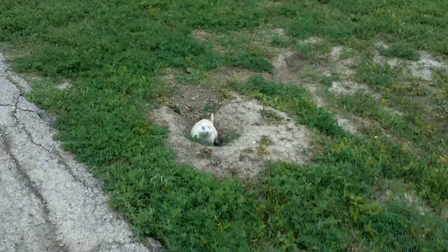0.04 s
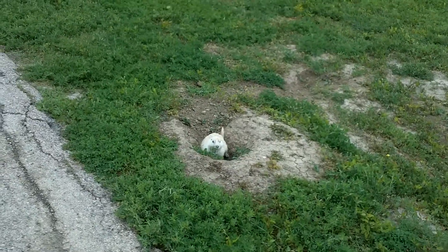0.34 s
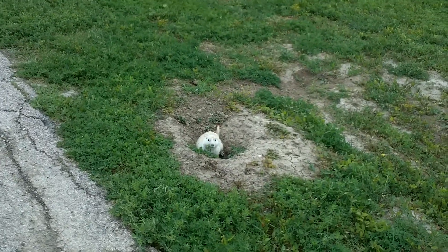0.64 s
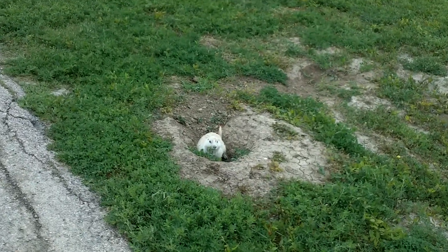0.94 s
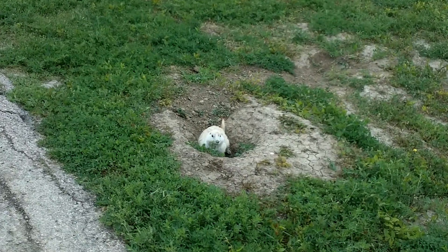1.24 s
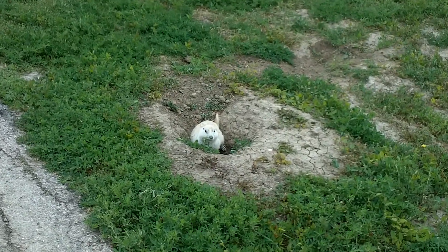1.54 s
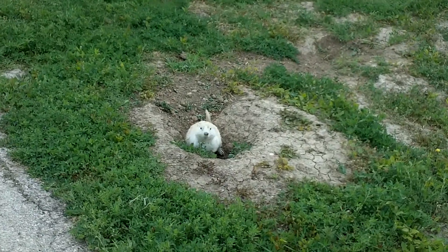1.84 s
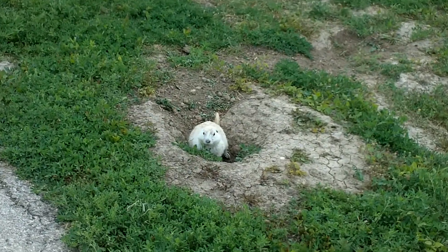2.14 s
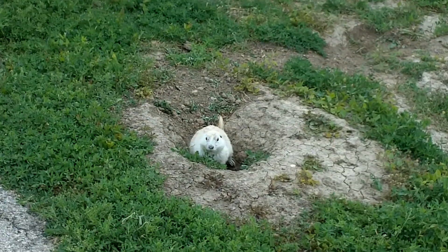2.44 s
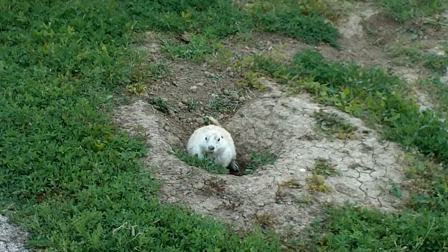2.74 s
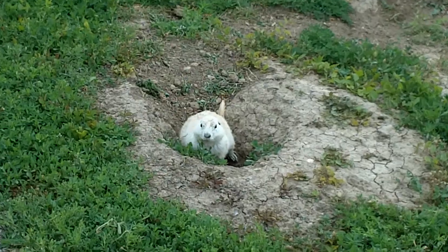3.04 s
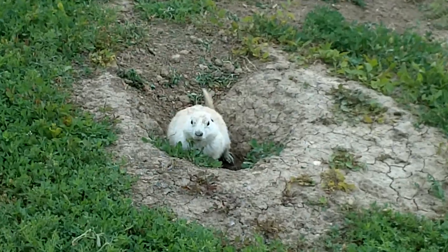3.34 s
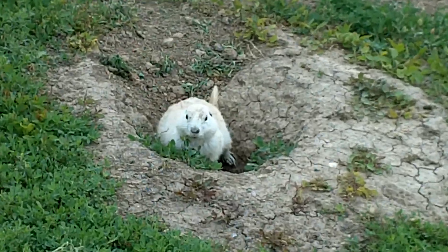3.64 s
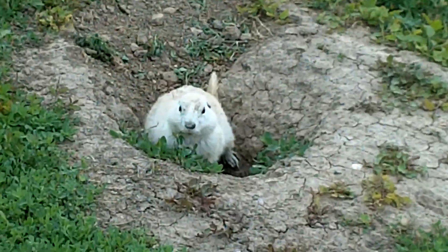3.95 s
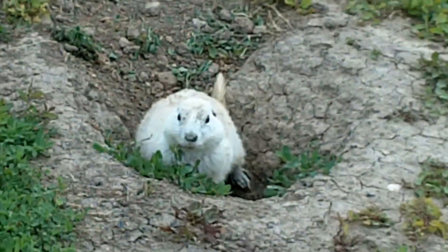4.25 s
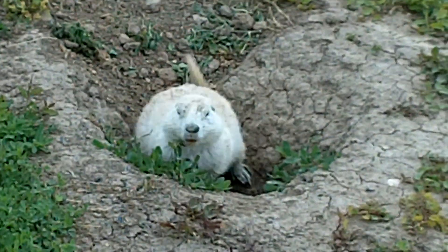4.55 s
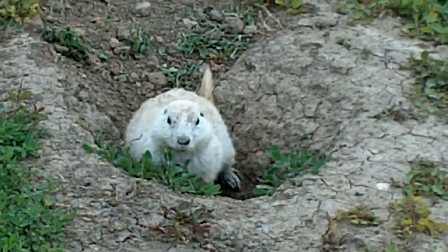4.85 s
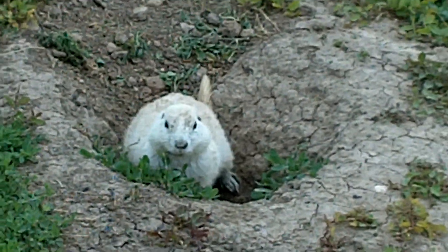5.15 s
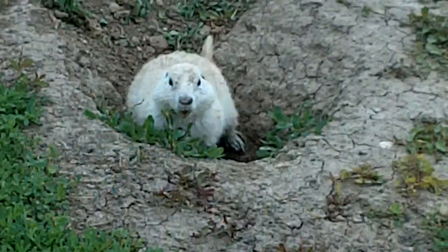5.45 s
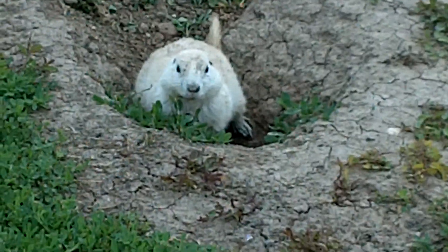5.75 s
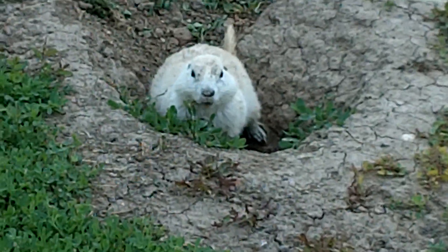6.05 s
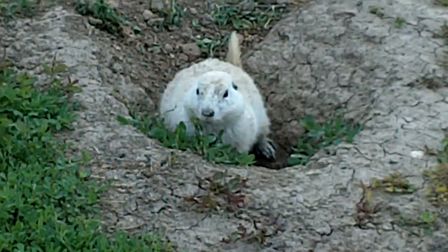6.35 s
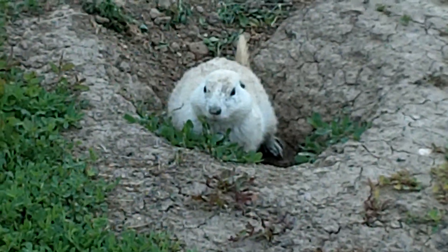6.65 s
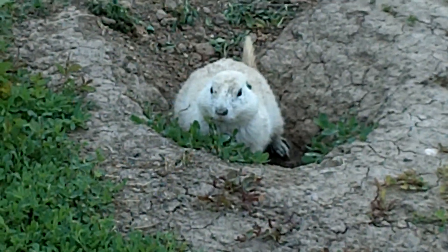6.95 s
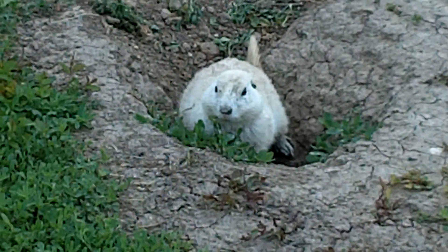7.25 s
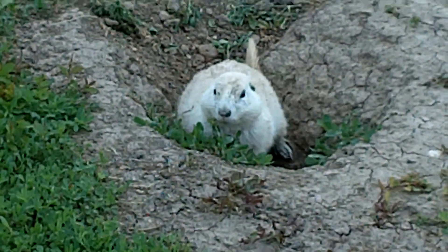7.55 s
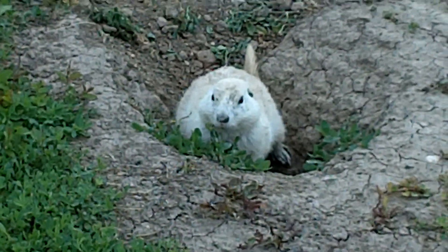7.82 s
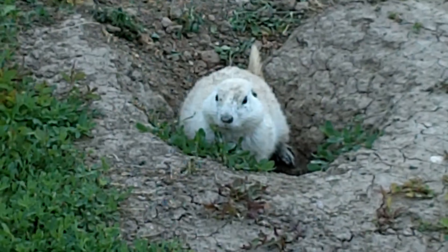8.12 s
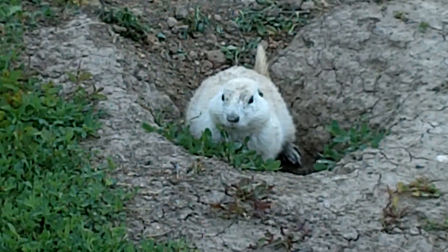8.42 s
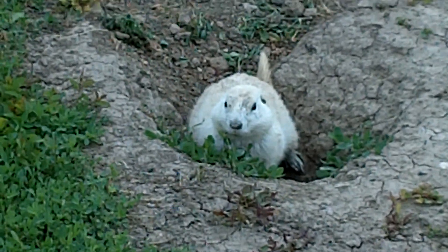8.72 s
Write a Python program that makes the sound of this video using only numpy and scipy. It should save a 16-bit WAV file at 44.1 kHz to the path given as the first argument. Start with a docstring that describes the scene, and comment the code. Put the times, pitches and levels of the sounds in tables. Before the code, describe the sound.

After a quick creak of handling on the microphone, a quiet open field is heard, with low distant traffic and faint high bird chirps. About two seconds in, a prairie dog starts barking: six short, piercing yips with pauses between them, far louder than anything else, the first ending in a small wheeze. The calls stop, and the rumble swells gently as a heavier vehicle goes by far away.

```python
"""A prairie dog at its burrow gives six sharp yips: arched harmonic calls that roughen as the vocal
folds flutter, each ending in two small rasps. The first trails off in a wheezy squeak; the far side of
the field returns a faint echo. Behind, distant traffic and an idling engine hum, small birds chirp and
a heavier vehicle passes near the end. A faint whine fades at the start. The hand-held camera creaks;
its gain control ducks on the yips."""
import sys
import numpy as np
from scipy import signal
from scipy.fft import rfft, irfft, next_fast_len
from scipy.io import wavfile
from scipy.ndimage import uniform_filter1d, minimum_filter1d, map_coordinates

SR = 44100
rng = np.random.default_rng(int(sys.argv[2]) if len(sys.argv) > 2 else 0)


def to_wav(sig):
    """Store sig (one row per channel, or 1-D mono) as 16-bit WAV at the path in sys.argv[1].

    Samples outside -1..1 are clipped; the rate is SR.
    """
    pcm = np.clip(np.atleast_2d(sig), -1, 1) * 32767
    pcm = np.round(pcm).astype(np.int16)
    wavfile.write(sys.argv[1], SR, pcm.T)  # frames by channels


N = 391608


def amp(db):
    """dB to gain."""
    return 10 ** (np.asarray(db) / 20)


def unit(x):
    """x at rms 1."""
    return x / np.sqrt(np.mean(x ** 2) + 1e-20)


def clock(length_s):
    """Sample times of a short sound."""
    return np.arange(max(int(length_s * SR), 16)) / SR


def add(track, at_s, sound):
    """Mix a sound into the track."""
    start = max(round(at_s * SR), 0)
    track[start:start + len(sound)] += sound[:N - start]


def gain(points, hz):
    """Gain curve through (f/Hz, level/dB) points; -68 dB/octave beyond the ends."""
    f, db = np.transpose(points)
    octaves_out = np.abs(np.log2((hz + 1) / np.clip(hz + 1, f[0], f[-1])))
    return amp(np.interp(np.log(hz + 1), np.log(f), db) - 68 * octaves_out)


def filtered(x, response):
    """x through a frequency response."""
    n = x.shape[-1]
    m = next_fast_len(n + 4096)
    return irfft(rfft(x, m) * response(np.fft.rfftfreq(m, 1 / SR)), m)[..., :n]


def coloured(x, points):
    """x through a gain curve, at rms 1."""
    return unit(filtered(x, lambda hz: gain(points, hz)))


def noise(size, points):
    """Coloured noise, rms 1."""
    return coloured(rng.standard_normal(size), points)


def wobble(size, rate_hz):
    """Smooth random curve, rate_hz knots a second."""
    knots = rng.standard_normal(int(size * rate_hz / SR) + 4)
    return map_coordinates(knots, [np.arange(size) * rate_hz / SR])


def cycle(hz):
    """Running phase/rad of a moving frequency."""
    return 2 * np.pi * np.cumsum(hz) / SR


def glide(length_s, pitches_hz, waver):
    """Softly swelling whistle, bent smoothly through the pitches."""
    u = np.linspace(0, 1, len(clock(length_s)))
    curve = np.polyfit(np.linspace(0, 1, len(pitches_hz)), pitches_hz, len(pitches_hz) - 1)
    hz = np.polyval(curve, u) * (1 + waver * wobble(len(u), 900))
    return np.sqrt(2) * np.sin(np.pi * u) * np.sin(cycle(hz))


def patchy(x, depth_db):
    """Moving air makes narrow bands of far sound swell and sink; rms 1."""
    bands = signal.stft(x, nperseg=2048)[2]
    swell = uniform_filter1d(rng.standard_normal(bands.shape), size=4, axis=0)
    swell = uniform_filter1d(swell, size=7, axis=1)
    return unit(signal.istft(bands * amp(depth_db * unit(swell)), nperseg=2048)[1][:N])


def idling_engine():
    """Two low hum lines, wandering in pitch and level."""
    # hum lines: f/Hz, width/Hz, level/dB re rumble
    lines = [(75.5, 5.65, -4), (115.6, 7.77, -5.5)]
    hum = np.zeros(N)
    for hz, width_hz, db in lines:
        peak = np.sqrt(2) * amp(db + 1.3 * wobble(N, 2.7))
        hum += peak * np.sin(cycle(hz + width_hz / 2 * wobble(N, 18)))
    return hum


def traffic():
    """Rumble and idle hum; a far road's drone, roar and tyres swell together; a heavier vehicle passes."""
    # spectra of far rumble, passing engine, drone, roar and tyre hiss: f/Hz, level/dB
    rumble_colour = [(15, -27), (25, 1.5), (38, -0.5), (55, -4), (75, -3), (95, -10), (120, -3),
                     (145, -7.5), (180, -13), (230, -18), (290, -24.5), (400, -23)]
    pass_colour = [(25, -9), (50, 0.5), (70, 1.5), (90, -1.5), (120, -4), (160, -11.5), (250, -22.5),
                   (400, -25)]
    drone_colour = [(200, -12.5), (320, -20), (450, -5), (570, 1), (720, -2), (850, 0.5), (1050, -15),
                    (1600, -16.5)]
    roar_colour = [(500, -9), (850, 3.5), (1000, 3), (1250, 2.5), (1500, -4), (1800, -20.5), (2600, -30)]
    tyre_colour = [(900, -8), (1700, 6), (2500, 0.5), (3300, -3.5), (4000, -11.5), (4750, -15.5),
                   (5400, -19), (6600, -24), (8000, -23.5), (12000, -43.5)]
    # road loudness: t/s, level/dB
    road = [(0.12, -45), (0.34, -49.5), (0.73, -51.5), (1.29, -46.5), (1.73, -57.5), (2.87, -57.5),
            (3.41, -52.5), (3.66, -55.5), (4.9, -52.5), (5.46, -55.5), (5.83, -53.5), (6.24, -54),
            (7.02, -45), (7.32, -48), (8.1, -46), (8.88, -46.5)]
    # tyre hiss swells: t/s, half width/s, lift/dB
    swells = [(1.03, 0.11, 2.5), (3.4, 0.15, 1.5), (4.95, 0.52, 2), (7.8, 0.26, 5.5)]
    usual_road_db, closest_s = -52, 8.01
    t = np.arange(N) / SR

    def passing(db, half_power_s):
        """1/distance gain of the vehicle."""
        return amp(db) / np.hypot(1, (t - closest_s) / half_power_s)

    busy_db = np.interp(t, *np.transpose(road)) - usual_road_db
    swells_db = sum(db * np.exp(-((t - at_s) / width_s) ** 2) for at_s, width_s, db in swells)
    rumble = amp(-53) * (idling_engine() + noise(N, rumble_colour))
    vehicle = passing(-46.5, half_power_s=0.74) * noise(N, pass_colour)  # carries farther than its drone
    drone_gain = np.hypot(amp(-56 + 0.25 * busy_db), passing(-42.5, half_power_s=0.15))
    drone = drone_gain * patchy(noise(N, drone_colour), depth_db=1.3)
    roar = amp(-52 + busy_db) * patchy(noise(N, roar_colour), depth_db=1.5)
    tyres = amp(-58.5 + 0.57 * busy_db + swells_db) * patchy(noise(N, tyre_colour), depth_db=2.4)
    return rumble + vehicle + drone + roar + tyres


def mic_hiss():
    """Steady noise floor of the microphone."""
    # hiss spectrum: f/Hz, level/dB
    colour = [(3000, -8), (4750, 3.5), (5500, -6.5), (6600, -7), (8000, 0.5), (10500, -10.5), (14000, -4.5),
              (15500, -13.5)]
    return amp(-72) * noise(N, colour)


def thin_whine():
    """Faint high tone, rising slightly as it fades."""
    out, t = np.zeros(N), clock(1.3)
    fade = 1 - (t / t[-1]) ** 2
    hz = 6600 + 130 * t ** 3 + 12 * wobble(len(t), 300)
    add(out, 0, amp(-82) * fade * np.sin(cycle(hz)))
    return out


def handling():
    """Camera body: dead clicks, each a snap, a dull housing knock and a hard crack; light brushing."""
    # creaks and clicks: t/s, snap/dB, knock/dB, crack/dB, t60/s
    clicks = [(0.0503, -34, -51, -40, 0.01), (0.0542, -21.5, -49, -34, 0.011), (0.063, -28, -40, -55, .013),
              (0.07, -34, -51, -42, 0.018), (0.0759, -31, -22.5, -47, 0.01), (0.0812, -36, -33, -52, 0.019),
              (0.084, -23.5, -28, -50, 0.01), (0.092, -26, -31, -47.5, 0.01),
              (5.502, -39.5, -46, -41.5, 0.0062), (5.523, -44, -54, -48.5, 0.027),
              (5.5336, -26, -30, -27, 0.007)]
    # snap spectrum: f/Hz, level/dB
    snap_colour = [(530, -5), (900, -14), (1880, 7), (2480, -1.5), (3420, 6.5), (4280, -9), (6730, -17),
                   (7960, -48), (10300, -32), (13900, -49), (15500, -40)]
    # brushing ticks: t/s, length/s, level/dB
    ticks = [(0.163, 0.022, -61), (0.223, 0.028, -60.5), (.291, 0.016, -61), (0.386, 0.023, -66),
             (.437, 0.014, -61), (0.488, 0.013, -61), (.558, 0.018, -64), (3.648, 0.07, -65.5),
             (4.792, 0.0032, -68), (4.975, 0.0092, -57.5), (5.121, 0.0077, -55)]
    out, t = np.zeros(N), clock(0.033)
    for at_s, snap_db, knock_db, crack_db, t60_s in clicks:
        snap = amp(snap_db) * noise(len(t), snap_colour)
        knock = amp(knock_db) * noise(len(t), [(220, -3), (600, 6), (1400, 6.5)])
        crack = noise(len(t), [(3000, -3), (5000, 0), (8000, -3), (13000, -5), (15500, -14)])
        envelope = amp(4 - 60 * t / t60_s) * (1 - np.exp(-t / 0.00089))
        add(out, at_s, (snap + knock + amp(crack_db) * crack) * envelope)
    for at_s, length_s, db in ticks:
        size = len(clock(length_s))
        brush = noise(size, [(3500, -7), (5300, 0), (7000, -9), (14000, -26)])
        add(out, at_s, amp(db) * np.hanning(size) * brush)
    return out


def birds():
    """One bird repeats three quick down-slurs; others buzz, whistle and twitter farther off."""
    # three-slur trills: t/s, level/dB
    trills = [(.472, -62), (.97, -64), (1.662, -64), (2.16, -61), (2.675, -63.5), (3.95, -60.5),
              (4.462, -68.5), (5.0, -59), (8.575, -61.5)]
    # far calls: t/s, length/s, start/Hz, middle/Hz, end/Hz, buzz/share of pitch, level/dB
    far_calls = [(1.005, 0.038, 5900, 6350, 6600, .05, -67), (1.058, 0.098, 6600, 6300, 5850, 0.02, -67.5),
                 (2.385, 0.029, 5600, 6200, 6400, .06, -64), (2.425, .11, 6350, 6300, 5300, .012, -67),
                 (3.942, 0.04, 5900, 6400, 6660, .05, -65.5), (4.037, .072, 5650, 6000, 5450, .015, -70),
                 (5.735, .2, 3240, 2360, 2930, 0.12, -60.5), (5.997, .065, 6100, 4270, 3750, 0.05, -65),
                 (6.37, .065, 4500, 3750, 3450, .02, -68), (8.26, .025, 6300, 7150, 7600, 0.1, -70),
                 (8.33, 0.069, 6200, 6400, 5900, 0.1, -72)]
    out = np.zeros(N)
    for at_s, db in trills:
        for k in range(3):
            slur = glide(.026, np.array([4440, 4350, 3990]) * (1 + rng.normal(0, 0.0073)), waver=.004)
            add(out, at_s + k * .051, amp(db + rng.normal(0, 1.5)) * slur)
    for at_s, length_s, *pitches_hz, buzz, db in far_calls:
        add(out, at_s, amp(db) * glide(length_s, pitches_hz, waver=buzz))
    for at_s in np.arange(.6, 7, .052):  # twitter
        late_s, detune, db = rng.uniform((0, .975, -76), (.025, 1.02, -70))
        add(out, at_s + late_s, amp(db) * glide(0.024, detune * np.array([4900, 4550]), waver=.004))
    return out


def yip_course(t, length_s, arch):
    """Scoop, sag and final collapse: share of pitch lost, and envelope. Slack folds are weaker."""
    scoop_s, sag_from_s, sag_per_s, drop_s = 0.00875, 0.023, 1.4, .0026
    attack_s, release_s = .0011, 0.0037
    scoop = arch * 0.1085 * np.exp(-(t / scoop_s) ** 2)
    sag = sag_per_s * np.maximum(t - sag_from_s, 0)
    drop = 0.34 / (1 + np.exp((length_s - t) / drop_s))
    slack = scoop + sag + drop
    gate = (1 - np.exp(-(t / attack_s) ** 2)) * np.exp(-np.maximum(t - length_s, 0) / release_s)
    return slack, gate * amp(-44.5 * slack)


def yip(length_s, top_hz, fade_db, arch, clean, overtone_db, top_db, burst_db):
    """Clean harmonics through the throat, until the folds flutter and alternate strong and weak beats."""
    # throat response, lifting harmonic 2: f/Hz, level/dB
    throat = [(900, -68), (1650, -19.5), (2300, -13.5), (3150, 2.5), (3600, -3), (4500, -21), (5350, -19.5),
              (6600, -18.5), (7250, -22), (8800, -45), (10700, -44), (12300, -42), (13400, -31),
              (14300, -32.5), (14900, -55)]
    # spectrum of the hoarseness: f/Hz, level/dB
    breath = [(1200, -19.5), (2000, 1.5), (2800, -9.5), (3900, 12), (5300, -16.5), (6800, 0.5), (7700, -34),
              (10000, -15), (11600, -9), (14000, -15), (14900, -35)]
    t = clock(length_s + 0.0074)  # room for the release
    progress, size = t / length_s, len(t)
    slack, envelope = yip_course(t, length_s, arch)
    burst = np.exp(-(t / 0.0022) ** 2)  # pent-up air escapes hard and hoarse
    rough = np.clip((progress - clean + .1) / .3, .075 + .55 * burst, 1)
    flutter = np.sin(cycle(420 * (1 + 0.254 * wobble(size, 200))))
    pitch_hz = top_hz * (1 - slack)
    jitter = rough * (.015 * flutter + .014 * wobble(size, 2600))
    phase = cycle(pitch_hz * (1 + jitter))
    shine_db = top_db - 1.5 * rough - 11.5 * burst
    voice = np.zeros(size)
    for k in range(1, 9):
        grit = 1 + rough * (.1 if k == 2 else .35) * wobble(size, 900)
        weight = gain(throat, k * pitch_hz) * amp(overtone_db * (k > 2) + shine_db * (k > 5))
        voice += grit * weight * np.sin(k * phase + rng.uniform(0, 2 * np.pi))
        # period doubling: unsteady lines halfway between harmonics
        doubling = amp(-19.5) * rough * (1 + .5 * wobble(size, 250)) * gain(breath, (k + .5) * pitch_hz)
        voice += doubling * np.sin((k + .5) * phase + .5 * wobble(size, 400))
    voice *= np.sqrt(2) * (1 + .27 * rough * flutter)
    hoarse = amp(-19.5) * rough * (1 + .6 * np.sin(phase)) * (1 + .5 * flutter)
    return (voice + hoarse * noise(size, breath)) * envelope * amp(fade_db * progress + burst_db * burst)


def rasp(length_s, throat_hz):
    """Slack folds flap unevenly as the throat closes: a quick run of tiny ticks."""
    # rasp spectrum: f/Hz, level/dB
    colour = [(600, -63), (1800, 4.5), (2500, 1), (3200, 4.5), (3800, 0.5), (4800, -7), (7000, -27),
              (9000, -24), (11000, -14), (15000, -22)]
    t = clock(length_s)
    flap_hz = 210 * np.exp(.35 * wobble(len(t), 200))
    turns = cycle(flap_hz) / (2 * np.pi) % 1
    flaps = amp(-13) + np.exp(-turns / .16)
    air = coloured(flaps * rng.standard_normal(len(t)), colour)
    ring = filtered(air, lambda hz: 1 + amp(3.5) * np.exp(-((hz - throat_hz) / 330) ** 2))
    return unit(ring) * amp(2.5 - 9 * t / length_s) * (1 - np.exp(-t / 0.0011))


def prairie_dog():
    """Six yips, each followed by two rasps."""
    # yips: t/s, length/s, top pitch/Hz, level/dB, fade/dB, arch/0-1, clean part/share of length,
    # harmonics 3-8/dB, harmonics 6-8 extra/dB, onset burst/dB, rasp/dB
    yips = [(1.8562, 0.05, 1765, -10.5, -7.5, 0.27, -0.064, 3, -3, -2, -39.5),
            (2.818, 0.044, 1716, -16.5, -1, 0.5, -0.11, 5.5, -5, -3, -39.5),
            (3.39, .054, 1748, -14.5, -1, 0.9, 0.57, 2.5, 10, -5, -40.5),
            (4.6312, 0.056, 1797, -11.5, -5, 0.99, .55, 1, 7, -4, -41),
            (5.572, .0555, 1796, -13, -3.5, 0.87, .68, 4, 3, 4, -41),
            (6.2117, 0.056, 1808, -12.5, -3, 1, 0.76, 2, 6.5, -3.5, -44.5)]
    # rasps: delay after yip end/s, length/s, level/dB re the yip's rasp level, throat resonance/Hz
    rasps = [(.008, 0.023, 1.5, 3760), (.052, 0.043, -11, 2830)]
    out = np.zeros(N)
    for at_s, length_s, top_hz, db, *manner, rasp_db in yips:
        add(out, at_s, amp(db) * yip(length_s, top_hz, *manner))
        for gap_s, rasp_s, step_db, throat_hz in rasps:
            add(out, at_s + length_s + gap_s, amp(rasp_db + step_db) * rasp(rasp_s, throat_hz))
    return out


def wheezy_squeak():
    """The first yip trails off in falling whistles over a wheeze."""
    # whistles: t/s, length/s, start/Hz, end/Hz, level/dB
    whistles = [(1.911, 0.087, 3850, 3660, -47), (1.946, 0.026, 2920, 2680, -40.5),
                (1.958, 0.025, 1894, 1610, -45), (1.961, 0.04, 1272, 1012, -45),
                (1.981, 0.052, 3110, 2330, -45), (1.984, 0.097, 298, 191, -56)]
    # wheeze envelope: t/s, level/dB
    wheeze = [(1.92, -60), (1.97, -44), (1.99, -50.5), (2.008, -43), (2.058, -71), (2.07, -64)]
    # wheeze spectrum: f/Hz, level/dB
    colour = [(290, -32), (500, -19), (949, -14), (1140, -5), (1500, -16), (1700, -13), (2840, -15),
              (7160, -31.5), (8130, -47), (10100, -28), (15000, -42)]
    out = np.zeros(N)
    for at_s, length_s, start_hz, end_hz, db in whistles:
        add(out, at_s, amp(db) * glide(length_s, [start_hz, end_hz], waver=0.055))
    times_s, levels_db = np.transpose(wheeze)
    t = times_s[0] + clock(times_s[-1] - times_s[0])
    add(out, times_s[0], amp(np.interp(t, times_s, levels_db)) * noise(len(t), colour))
    return out


def field_echo(x, delay_s, echo_db, smear_s, ground_db, ground_t60_s):
    """Open ground scatters a little at once; one blurred echo returns from far off."""
    t = clock(.5)
    late = np.maximum(t - delay_s, 0) / smear_s
    paths = [(ground_db, amp(-60 * t / ground_t60_s)), (echo_db, late * np.exp(-late))]
    tail = sum(amp(db) * unit(shape * rng.standard_normal(len(t))) for db, shape in paths)
    reflected = signal.fftconvolve(x, tail / np.sqrt(len(t)))[:N]
    bright = [(1500, -8), (3400, -8), (5300, 4), (7000, -1), (12000, -3)]  # f/Hz, level/dB
    return filtered(reflected, lambda hz: gain(bright, hz))


def gain_control(x, threshold_db, slope, hold_s, smooth_s):
    """Cuts the level by a share (slope) of its excess over the threshold, and holds the cut briefly."""
    power = np.abs(uniform_filter1d(np.mean(x ** 2, axis=0), size=64))
    cut_db = -slope * np.maximum(10 * np.log10(power + 1e-12) - threshold_db, 0)
    half = int(hold_s * SR / 2)
    held_db = minimum_filter1d(cut_db, 2 * half + 1, origin=half)
    pole = np.exp(-1 / (smooth_s * SR))
    return x * amp(signal.lfilter([1 - pole], [1, -pole], held_db))


def scene():
    """All sources summed; the right channel slightly leads the left."""
    dog = prairie_dog() + wheezy_squeak()
    echo = field_echo(dog, delay_s=0.206, echo_db=-44, smear_s=.014, ground_db=-27, ground_t60_s=0.12)
    mono = dog + echo + birds() + thin_whine() + handling() + traffic() + mic_hiss()
    lag_s = 21e-6
    return filtered(mono, lambda hz: np.exp(1j * np.pi * hz * lag_s * np.array([[-1], [1]])))


def record(dry):
    """Narrow microphone dips, gain control, band limit."""
    # microphone dips: f/Hz, half width/Hz, level/dB
    notches = [(4202, 181, -15.5), (7600, 600, -9), (8670, 840, -17.5), (13000, 570, -26)]
    dips_db = lambda hz: sum(db * np.exp(-((hz - f) / width_hz) ** 2) for f, width_hz, db in notches)
    picked_up = filtered(dry, lambda hz: amp(dips_db(hz)))
    ducked = gain_control(picked_up, threshold_db=-23.5, slope=0.48, hold_s=0.03, smooth_s=0.002)
    return filtered(ducked, lambda hz: hz < 15500)


dry = scene()
out = record(dry)
to_wav(out)
```